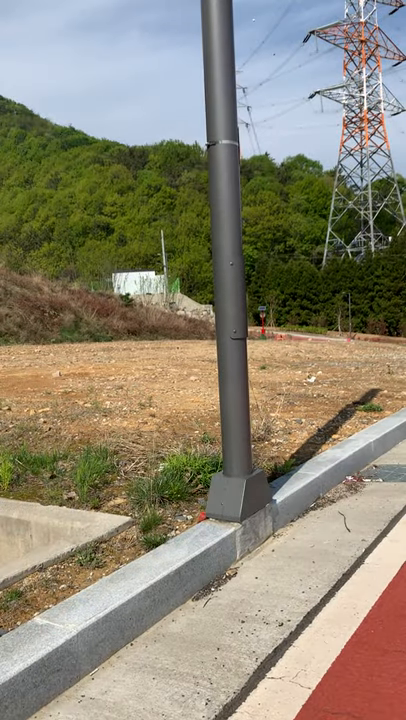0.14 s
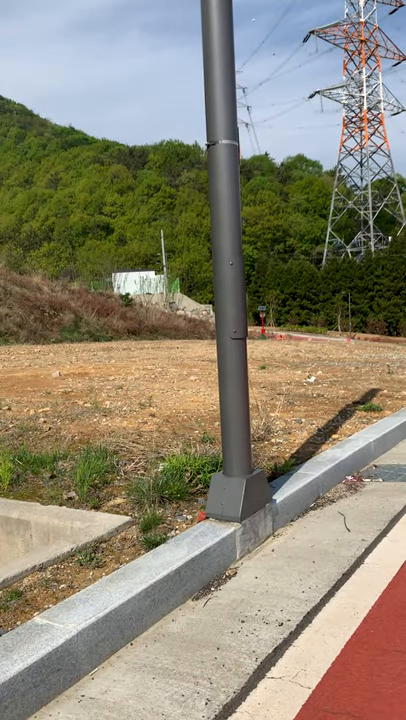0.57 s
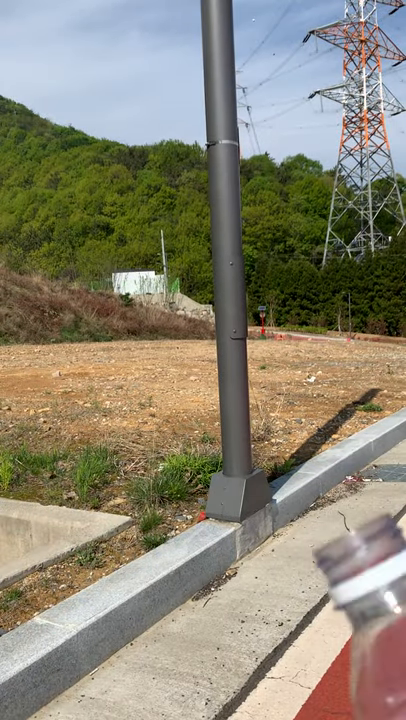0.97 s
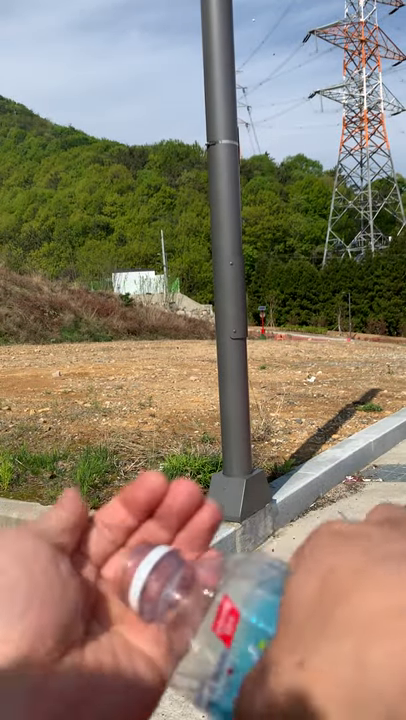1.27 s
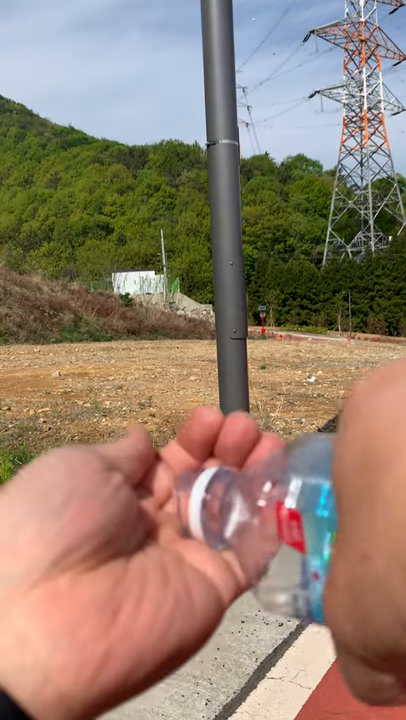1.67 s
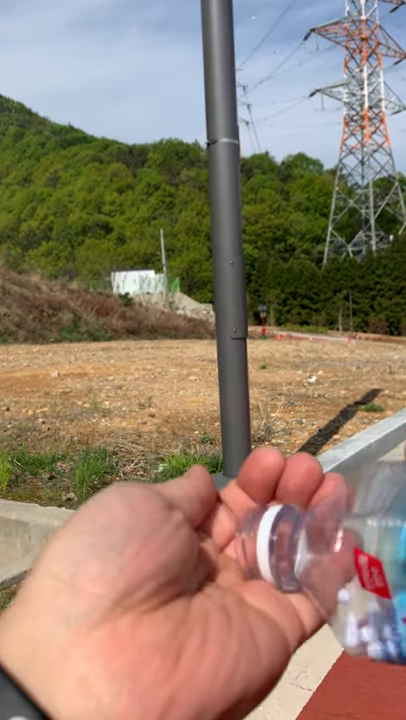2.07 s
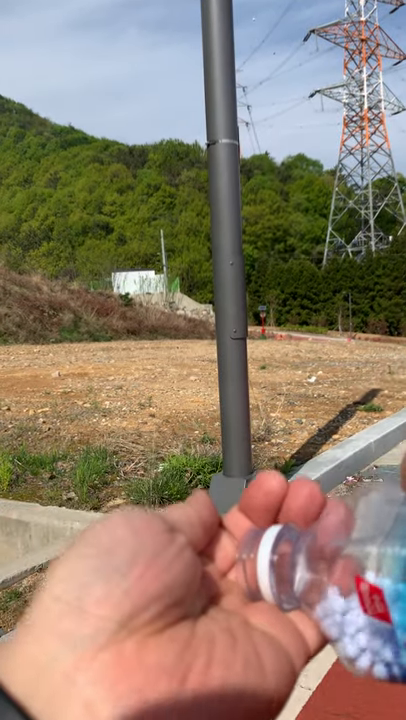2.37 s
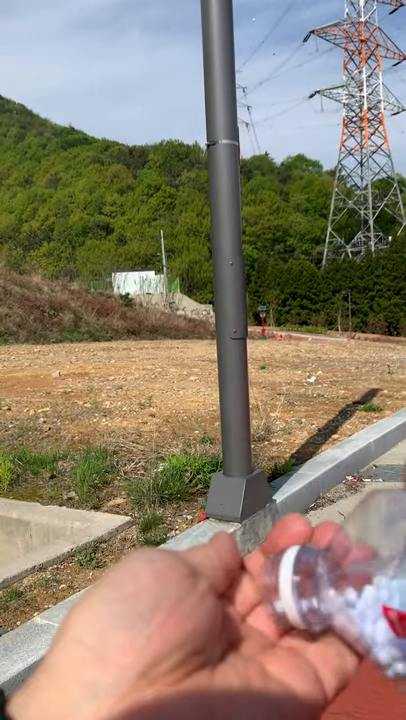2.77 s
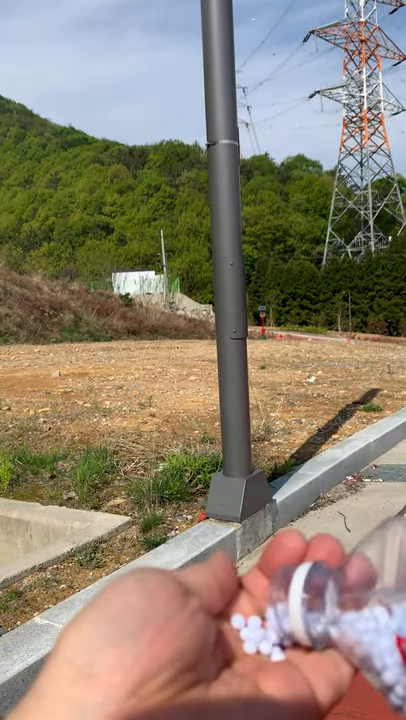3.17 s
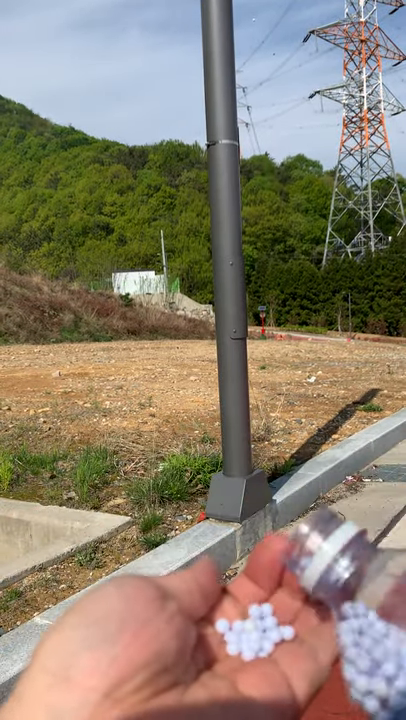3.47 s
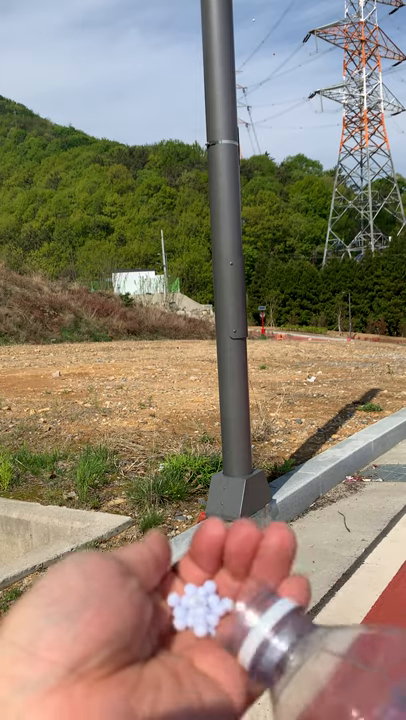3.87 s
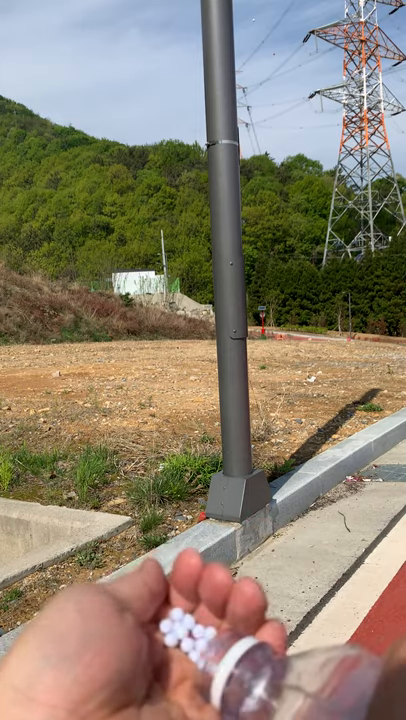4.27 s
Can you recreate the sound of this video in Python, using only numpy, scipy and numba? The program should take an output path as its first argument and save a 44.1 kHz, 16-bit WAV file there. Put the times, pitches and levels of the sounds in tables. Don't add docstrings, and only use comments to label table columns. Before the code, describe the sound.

Small hard pellets settle in a thin plastic bottle with soft hand knocks, then a quiet gap holds faint ticks and wall crinkles. The bottle tips with a hollow rushing rattle, followed by quick rhythmic shakes that turn bright and sharp. Pellets drop into a palm, then another dense roll sounds as the bottle tips back. Close phone stereo outdoors, with low wind rumble and faint insects.

```python
import sys
import numpy as np
from scipy import signal
from scipy.fft import rfft, irfft
from scipy.io import wavfile
from scipy.ndimage import uniform_filter1d
from numba import njit

SR = 44100
rng = np.random.default_rng(int(sys.argv[2]) if len(sys.argv) > 2 else 0)


def log_audio(samples):
    frames = np.atleast_2d(samples).T
    limited = np.clip(frames, -1, 1)
    pcm = np.round(limited * 32767).astype(np.int16)
    wavfile.write(sys.argv[1], SR, pcm)


def how_loud(loudness_db):
    steps = np.asarray(loudness_db, float) / 20
    return 10 ** steps


N = 195539
HZ = np.maximum(np.fft.rfftfreq(N, 1 / SR), 1)
TIME = np.arange(N) / SR

# frequency_hz, density_db
RUMBLE = [(12, -45), (20, -39), (44, -2.5), (59, 6.5), (75, 3), (120, -8), (160, -27), (260, -120)]
# frequency_hz, density_db
LOW_BODY = [(90, -12), (140, -2), (210, 5.5), (450, -7.5), (700, -27), (1500, -59)]
# centre_s, level_db, length_ms
GUSTS = [(.1, -38, 37), (.3, -48.5, 52), (.74, -49.5, 180), (.89, -46, 16), (1.14, -47.5, 46),
         (1.55, -44, 180), (1.82, -39.5, 28), (1.899, -41.5, 19), (2.22, -48.5, 120), (2.45, -45, 37),
         (2.6, -40, 23), (2.68, -39, 48), (3.0, -40, 61), (3.131, -43, 60), (3.4, -49.5, 41),
         (3.56, -38.5, 28), (3.66, -41, 49), (3.76, -39.5, 35), (4.1, -47.5, 43), (4.27, -41, 73),
         (4.43, -47, 24)]
# centre_s, level_db, length_ms
LOW_SWELLS = [(0.049, -42.5, 31), (.14, -50.5, 35), (.7, -52.5, 16), (1.019, -56.5, 89), (1.49, -44.5, 150),
              (1.96, -45.5, 48), (2.26, -51, 300), (2.6, -49, 20), (2.8, -50, 60), (2.99, -49, 38),
              (3.08, -48, 11), (3.29, -56, 51), (3.75, -44, 73), (3.87, -38.5, 40), (4.35, -50.5, 290)]
# frequency_hz, density_db
HUM = [(88, -1), (150, 9), (189, -10), (450, 0.5), (936, -5.5), (2970, -29), (4210, -30.5), (5400, -36),
       (8580, -32), (12600, -62.5), (15000, -38)]
# frequency_hz, density_db
INSECT = [(5600, -28), (6500, -7), (8400, -4), (8800, 1), (9300, -13), (10500, -16), (12000, -29)]
# time_s, motion_db
SLIDES = [
    [(0.0, -36.5), (0.082, -26.5), (0.158, -41), (0.18, -52), (0.22, -54.5), (0.28, -68), (0.34, -76)],
    [(1.1, -78), (1.27, -53), (1.342, -33), (1.388, -26.5), (1.482, -21.5), (1.604, -33), (1.62, -26.5),
     (1.692, -30.5), (1.748, -42.5)],
    [(3.3, -41), (3.4, -56), (3.6, -48), (3.65, -34.5), (3.712, -20), (3.868, -18), (3.89, -20.5),
     (4.08, -35.5), (4.16, -44)],
    [(4.16, -50), (4.23, -44), (4.27, -46), (4.31, -47), (4.36, -40), (4.43, -34.5)],
]
# peak_s, motion_db, rise_ms, fall_ms
SHAKES = [(1.793, -31.5, 29, 80), (1.925, -28.5, 37, 28), (1.975, -33, 12, 15), (2.035, -28, 44.4, 43),
          (2.119, -22.5, 19.7, 28.4), (2.229, -24, 47, 33), (2.327, -25, 35, 23), (2.439, -24.5, 45, 28),
          (2.531, -25, 36.4, 29.4), (2.645, -26.5, 43, 22.7), (2.726, -29.5, 26, 40.4),
          (2.829, -30.5, 18.7, 36), (2.966, -23, 18.1, 28.5), (3.006, -31.5, 16, 12),
          (3.115, -31.5, 13, 14), (3.05, -34.5, 22, 9), (2.93, -35.5, 8.5, 13), (3.07, -25, 9.3, 45.4),
          (3.184, -31.5, 51, 61), (3.299, -41, 27, 43)]
# time_s, share of the tick level (0-1)
FALLING = [(0, 0.22), (2.3, 0.32), (2.6, 0.31), (3.15, 0.64), (3.3, 0.89), (3.38, 0.84), (3.56, 0.4),
           (3.62, 0.3), (4.2, 0.26), (4.3, 0.5), (4.43, 0.3)]
# time_s, place (-1 belly to 1 neck)
TURN = [(0, -0.2), (1.35, -0.56), (1.6, 0.96), (1.8, 1), (2.5, 0.36), (3.0, 0.99), (3.4, 0.73),
        (3.8, -0.33), (4.1, -1.35), (4.43, 0.66)]
# frequency_hz, left_db, right_db
WALL = [(246, -30, -13.5), (405, -13.5, -14), (649, -16.5, -11.5), (804, -7, -2), (1215, 2, 1),
        (1470, -1, 4), (1980, 1.5, -3), (2070, -3.5, 4.5), (2574, -10, -7), (2900, -9.5, -4.5),
        (4450, -5.5, -3.5), (5280, -23, -12)]
# frequency_hz, left_db, right_db
TICK = [(1500, -36, -34), (3330, -13, -57), (4330, -5.5, 1.5), (5380, 7, 8), (7900, 2, 0.5),
        (11340, 2.5, 4), (13500, -2, -1.5), (16060, -11, -12), (16600, -33, -24)]
# frequency_hz, share (0-1)
COMMON = [(300, 1), (650, 0.2), (1000, 0.72), (1800, 0.86), (2600, 0.08), (3800, 1), (5000, 0.68),
          (9000, 0.7), (14000, 0.7)]
# frequency_hz, lead (half turns)
LEAD = [(0, 0), (600, -.4), (900, -.05), (1300, -.22), (2100, .05), (2800, .55), (4000, .55), (4980, 1),
        (8300, 2), (12450, 3), (15900, 4), (22050, 5.8)]
# start_s, pitch_hz, level_db, t60_s
KNOCKS = [(0.048, 131, -20.5, 0.049), (0.062, 71, -32, 0.1), (0.107, 106, -28.5, 0.078),
          (0.133, 150, -28.5, 0.064), (0.198, 291, -41, 0.02), (0.692, 414, -36, 0.045),
          (0.713, 77.4, -31.5, 0.16), (1.958, 1020, -21.5, 0.017), (1.958, 1910, -29, 0.0082),
          (1.959, 293, -28, 0.045), (3.39, 1630, -27.5, 0.018), (3.759, 119.5, -24.5, 0.06),
          (4.233, 80, -26, 0.073), (4.244, 71.5, -24.5, 0.061)]
# start_s, pitch_hz, level_db, t60_s
POPS = [(.197, 1360, -32, .02), (.203, 760, -33.5, 0.019), (.6232, 834, -39, 0.034),
        (.6225, 1216, -32, 0.039), (.6218, 1870, -36, .03), (.6228, 2500, -40, .03),
        (.6235, 3460, -37, .015), (0.636, 1250, -50, .03), (.652, 740, -49, .03), (.6545, 760, -43, .03),
        (.747, 2800, -55, .015), (.6858, 1940, -38, 0.024), (0.685, 2670, -33, 0.022),
        (.687, 716, -32.5, 0.05), (0.695, 1300, -42, 0.028), (0.694, 2960, -46, 0.014),
        (.693, 4910, -50, .02)]
# start_s, wall_db, tick_db
CLACKS = [(0.1741, -33, -40.5), (1.2796, -42.5, -59), (1.3139, -34, -50), (1.4861, -14, -38),
          (1.5098, -27, -38), (1.6418, -34, -38), (1.7024, -25, -47), (1.7324, -32, -56),
          (1.7603, -43, -46), (1.7749, -35, -41), (1.8417, -31, -43), (2.0857, -20, -27),
          (2.2247, -18, -28.5), (2.3487, -27, -27), (2.419, -29, -23), (2.4518, -22, -25.5),
          (2.6274, -25, -24), (2.6521, -24, -28), (2.6669, -37, -42), (2.6754, -44, -39),
          (2.7334, -22, -40), (2.7727, -22, -39), (2.7779, -28, -32), (2.8823, -34, -33.5),
          (2.9007, -47, -44), (2.9749, -29, -15.5), (3.0116, -22, -19.5), (3.0625, -39.5, -32),
          (3.1137, -38, -20), (3.1295, -22, -39), (3.174, -39, -38), (3.181, -47, -19), (3.1955, -42, -24),
          (3.2063, -43, -39), (3.2297, -56, -29), (3.2375, -47, -28.5), (3.2541, -49, -39),
          (3.2811, -40, -34), (3.6013, -33, -55), (3.6389, -44, -43), (3.971, -18, -40), (4.1083, -34, -53),
          (4.1416, -45, -39.5), (4.1488, -41, -57)]
# start_s, level_db, snap_db (over level), length_ms, panel_hz
CREASES = [(0.195, -41, -10.5, 11, 1110), (0.603, -47.5, -34, 73, 1380), (0.621, -43, -13.5, 7.5, 1160),
           (0.6536, -52, -42, 7.2, 744), (0.676, -49.5, -21, 30, 930), (0.6848, -42, -25, 6.6, 1400),
           (0.692, -43, -28, 7, 690)]
# start_s, wall_db, tick_db
STRAYS = [(0.2516, -47, -65), (0.274, -60, -74), (0.301, -60.5, -70), (0.31, -55, -68), (0.334, -50.5, -65),
          (0.4042, -56.5, -71), (0.4812, -71, -78), (0.4977, -64, -76), (0.521, -58, -72),
          (0.7476, -63, -78), (0.762, -62, -80), (0.774, -65, -82), (0.802, -64, -72), (0.851, -62, -80),
          (0.8958, -64, -77), (0.92, -55, -69), (0.9448, -64, -81), (1.0006, -65, -78), (1.014, -60, -72),
          (1.0624, -67, -77), (1.0732, -62, -70), (1.094, -58, -78), (1.117, -62, -78), (1.132, -58, -72),
          (1.163, -55, -74), (1.171, -46.5, -61), (1.185, -43.5, -67), (1.226, -50, -76),
          (1.2377, -49, -72), (1.2518, -43, -70)]
# start_s, wall_db, tick_db
DROPS = [(1.957, -18, -44), (2.9186, -33, -42.5), (3.3044, -33, -34), (3.313, -50, -42), (3.319, -51, -57),
         (3.3392, -43, -39), (3.351, -55, -46), (3.354, -36, -45), (3.3663, -52, -42), (3.372, -60, -45),
         (3.3893, -32.5, -46), (3.412, -69, -45), (3.428, -38, -33.5), (3.444, -65, -53),
         (3.4524, -60, -54), (3.4603, -49, -39), (3.4693, -42.5, -44), (3.478, -60, -42),
         (3.4903, -60, -49), (3.499, -52, -38.5), (3.5025, -41.5, -44), (3.51, -60, -49),
         (3.5168, -64, -53), (3.5264, -38, -38), (3.541, -57, -46), (3.5562, -38, -46.5), (3.575, -52, -51),
         (3.5831, -56, -61), (3.6022, -37, -54)]
# start_s, wall_db, tick_db
RETURNS = [(4.1744, -31, -50), (4.213, -52, -57), (4.227, -34, -60), (4.249, -34, -58), (4.2699, -54, -54),
           (4.2793, -31, -31.5), (4.2899, -29, -39), (4.298, -57, -43), (4.3125, -54, -55),
           (4.325, -31.5, -39.5), (4.336, -42, -41), (4.3419, -37, -42), (4.3592, -30, -32),
           (4.3762, -27, -39), (4.383, -27, -43), (4.3913, -28, -36), (4.396, -34, -38), (4.4021, -51, -50),
           (4.4191, -26.5, -54), (4.4241, -45, -38)]
# start_s, wall_db, tick_db
SINGLES = [(.927, -66, -72), (.967, -70, -77), (1.109, -62, -68), (1.159, -55, -69), (1.293, -47, -57),
           (1.34, -35, -45), (1.446, -22, -42), (1.901, -30, -46), (2.029, -29.5, -38), (2.109, -23, -32),
           (2.12, -24, -27), (2.299, -32, -38.5), (2.702, -26, -42), (2.726, -27, -40), (2.824, -25, -42),
           (2.849, -39, -45), (2.932, -27, -49), (2.957, -24, -28), (2.969, -18, -30), (3.044, -32, -50),
           (3.07, -31, -28), (3.13, -31, -45), (3.29, -34, -51), (3.2998, -33, -47), (3.3485, -45, -41),
           (3.401, -60, -53), (3.484, -60, -46), (3.522, -61, -47), (3.653, -29, -46), (3.667, -30, -45),
           (3.684, -20, -36), (3.709, -24, -36), (3.762, -14, -27), (3.792, -16, -32), (3.807, -16, -30.5),
           (3.859, -25, -23), (3.871, -23, -19), (3.925, -18, -32), (4.01, -30, -44), (4.099, -34, -50),
           (4.348, -45, -41.5), (4.387, -43, -46), (4.421, -40, -36)]
# centre_s, pitch_hz, level_db, length_ms
BIRD = [
    (.94, 3780, -77, 10),
    (1.115, 3820, -73, 22),
]
# time_s, left_over_right_db
SHADE = [(0, 4.5), (.2, 2), (1.2, -0.5), (1.6, 3), (1.8, -1.5), (2.4, -1.5), (2.9, -0.5), (3.35, -2.5),
         (3.6, 2), (3.9, 2), (4.2, 4.5), (4.43, 1.5)]


def across(table, column=1):
    table = np.array(table, float)
    return np.interp(np.log(HZ), np.log(table[:, 0]), table[:, column])


def over_time(table):
    return np.interp(TIME, *np.transpose(table))


def noise(table):
    x = irfft(rfft(rng.standard_normal(N)) * how_loud(across(table)), N)
    return x / x.std()


def walk(rate):
    k = int(SR / rate)
    held = np.repeat(rng.standard_normal(N // k + 1), k)
    return 1.1 * uniform_filter1d(uniform_filter1d(held, k), k)[:N]


def swell(s, rise_ms, fall_ms):
    return np.exp(-((TIME - s) * 1e3 / np.where(TIME < s, rise_ms, fall_ms)) ** 2)


def swells(table, floor_db):
    power = sum(how_loud(2 * db) * swell(s, ms, ms) for s, db, ms in table)
    return np.sqrt(how_loud(2 * floor_db) + power)


def band(x, hz, octaves):
    return irfft(rfft(x) * np.exp(-(np.log2(HZ / hz) / octaves) ** 4), N)


@njit
def rings(start, hz, t60, size, count):
    out = np.zeros(count)
    for k in range(len(start)):
        fade = np.log(1000) / (t60[k] * SR)
        p = np.exp(2j * np.pi * hz[k] / SR - fade)
        z = size[k] * np.sqrt(4 * fade) + 0j
        for i in range(start[k], min(count, start[k] + int(t60[k] * SR) * (size[k] != 0))):
            z *= p
            out[i] += z.imag
    return out


def hits(s, size, low_hz, high_hz, t60, order, skid_ms=0):
    s = np.repeat(s, order)
    size = np.repeat(size, order) / np.sqrt(order)
    place, long, sign = np.moveaxis(rng.random((len(s), 2, 3)), 2, 0)
    slot = np.arange(len(s))[:, None] % order
    hz = low_hz + (high_hz - low_hz) * (slot + place) / order
    start = ((s + skid_ms / 1e3 * (long[:, 0] - .5)) * SR).astype(np.int64)
    t60 = t60 * (0.28 + long)
    size = size[:, None] * np.sign(sign - .5)
    return [rings(start, hz[:, c].copy(), t60[:, c].copy(), size[:, c].copy(), N) for c in range(2)]


def ports(pair, colour, apart=1):
    shared, own = rfft(pair[0]), rfft(pair[1])
    share = 1 - np.clip(apart * (1 - across(COMMON)), 0, 1)
    lag = np.exp(-1j * np.pi * np.interp(HZ, *np.transpose(LEAD)))
    right = lag * (np.sqrt(share) * shared + np.sqrt(1 - share) * own)
    left_gain = how_loud(across(colour, column=1))
    right_gain = how_loud(across(colour, column=2))
    return np.array([irfft(shared * left_gain, N), irfft(right * right_gain, N)])


def wide(table, width):
    return noise(table) + width * noise(table) * np.array([[1], [-1]])


def low_end():
    gust = swells(GUSTS, floor_db=-53)
    low_body = swells(LOW_SWELLS, floor_db=-57.5)
    both = gust * wide(RUMBLE, 0.5) + low_body * wide(LOW_BODY, 0.19)
    return both * how_loud([[0.6], [-0.6]])


def hum():
    return how_loud(-58 + 0.5 * walk(6.6)) * wide(HUM, 0.99)


def insects():
    return how_loud(-78.5 + 3.3 * walk(42.2)) * noise(INSECT)


def motion():
    restless_db = -50
    power = 1e-12 + how_loud(2 * restless_db) * ((TIME > 1.74) & (TIME < 3.3))
    for slide in SLIDES:
        power += how_loud(2 * np.interp(TIME, *np.transpose(slide), left=-120, right=-120))
    for s, db, rise_ms, fall_ms in SHAKES:
        power += how_loud(2 * db) * swell(s, rise_ms, fall_ms)
    return np.sqrt(power)


def swarm(level, most, full_db, spread_db):
    s, lot, big = rng.random((int(most * N / SR), 3)).T
    now = level[(s * N).astype(int)]
    share = np.clip(now / how_loud(full_db), .25, 1)
    size = how_loud(spread_db * np.minimum(-np.log(big), 5))
    size *= now * (lot < share) / np.sqrt(np.mean(size ** 2) * share * most / SR)
    return s * N / SR, size


def rolling_pellets():
    wall = motion()
    free = np.clip(over_time(FALLING), 0, 1)
    trend = np.gradient(uniform_filter1d(np.log(wall), size=4410)) * SR / 10
    tick = wall * how_loud(-9 + 9.5 * free + 0.5 * np.tanh(trend))
    tick = tick * (wall / uniform_filter1d(wall, size=5000)) ** (0.73 * free)
    wall_hits = swarm(wall, most=10000, full_db=-24, spread_db=2.0)
    inside_hits = swarm(tick * np.sqrt(1 - free ** 2), most=12000, full_db=-30.5, spread_db=1.5)
    outside_hits = swarm(tick * free, most=680, full_db=-36, spread_db=2.4)
    ring = hits(*wall_hits, 268, 4990, 0.018, order=4)
    inside = hits(*inside_hits, 2000, 16600, 0.0042, order=4)
    outside = hits(*outside_hits, 3900, 16600, 0.0015, order=8)
    return how_loud(4.5) * ports(ring, WALL) + how_loud(3.5) * ports(np.add(inside, outside), TICK)


def knocks():
    s, hz, db, t60 = np.transpose(KNOCKS + POPS)
    thump = rings((s * SR).astype(np.int64), hz.copy(), t60.copy(), how_loud(db + 21.0), N)
    return uniform_filter1d(thump, size=9)


def clacks():
    s, wall_db, tick_db = np.transpose(CLACKS)
    ring = hits(s + 0.0006, how_loud(wall_db + 20.0), 690, 3040, 0.014, order=10, skid_ms=1.5)
    tick = hits(s, how_loud(tick_db + 18.5), 4800, 16600, 0.0033, order=24, skid_ms=.8)
    return ports(ring, WALL) + ports(tick, TICK)


def creases():
    out = np.zeros((2, N))
    pan = how_loud([[4.5], [-4.5]])
    for s, db, snap_db, ms, hz in CREASES:
        late = np.r_[rng.random(60), 1 + 2 * rng.random(40)]
        when = s + ms / 1e3 * late
        size = how_loud(db - 4.1 * late - 3.7 * (late > 1) + 1.8 * rng.standard_normal(100))
        panel = hits(when, size * how_loud(12.0), 0.73 * hz, 1.39 * hz, 0.017, order=2)
        shoulder = hits(when, size * how_loud(6.0), 2500, 2550, 0.0037, order=1)
        middle = hits(when, size * how_loud(2.5 + 0.19 * snap_db), 1600, 5800, 0.0027, order=2)
        snap = hits(when, size * how_loud(snap_db + 17.0), 6600, 9500, 0.0036, order=3)
        left, own = np.sum([uniform_filter1d(panel, size=11), shoulder, middle, snap], axis=0)
        out += pan * np.array([left, .5 * left + 2.7 * own])
    return out


def lone_pellets():
    s, wall_db, tick_db = np.transpose(STRAYS + DROPS + RETURNS)
    ring = hits(s + 0.00055, how_loud(wall_db + 18.0), 563, 4666, 0.022, order=12, skid_ms=1.2)
    tick = hits(s, how_loud(tick_db + 28), 6300, 16600, .004, order=24, skid_ms=.8)
    return how_loud(4.5) * ports(ring, WALL) + ports(tick, TICK, apart=0.49)


def taps():
    s, wall_db, _ = np.transpose(STRAYS)
    left, own = hits(s, how_loud(wall_db + 14), 1600, 7200, 0.0028, order=12)
    return np.array([left, 0.37 * left + 0.94 * own])


def singles():
    s, wall_db, tick_db = np.transpose(SINGLES)
    ring = hits(s + 0.00062, how_loud(wall_db + 20.0), 716, 2750, 0.008, order=10)
    tick = hits(s, how_loud(tick_db + 24.5), 6200, 16600, 0.004, order=24, skid_ms=.8)
    s, _, tick_db = np.transpose(DROPS + RETURNS)
    after = hits(s + 0.00052, how_loud(tick_db + 10), 6600, 13000, 0.038, order=30)
    return ports(ring, WALL) + ports(tick + how_loud(4.5) * np.array(after), TICK)


def bird():
    notes = np.zeros(N)
    for s, hz, db, ms in BIRD:
        t = TIME - s
        glide_hz = hz + 1500 * t / 2
        notes += how_loud(db) * swell(s, ms * 1.6, ms) * np.sin(2 * np.pi * glide_hz * t)
    return how_loud(2.7 * walk(59.7)) * notes * np.array([[1.], [1.3]])


def tilted(x):
    place = over_time(TURN)
    belly = (how_loud(-2 * place) - 1) * band(x, 750, 0.58)
    neck = (how_loud(4 * place) - 1) * band(x, 3060, 0.63)
    return x + belly + neck


def shaded(x):
    db = over_time(SHADE) * np.array([[0.6], [-0.4]])
    return x + (how_loud(db) - 1) * band(x, 2300, 0.5) + (how_loud(0.37 * db) - 1) * x


def scene():
    air = low_end() + hum() + insects() + bird()
    bottle = tilted(rolling_pellets() + lone_pellets()) + clacks() + singles()
    return shaded(bottle) + knocks() + creases() + taps() + air


def band_limit(x):
    return signal.sosfilt(signal.butter(12, 16670, fs=SR, output="sos"), x)


def record(dry):
    mix = dry / (1 + (dry / 0.71) ** 4) ** 0.29
    return band_limit(mix)


dry = scene()
out = record(dry)
log_audio(out)
```